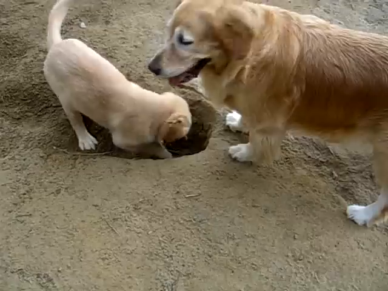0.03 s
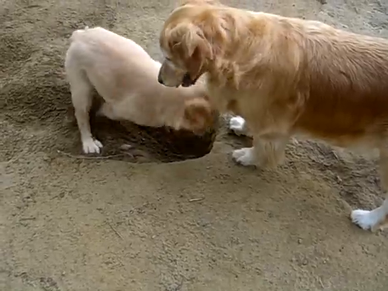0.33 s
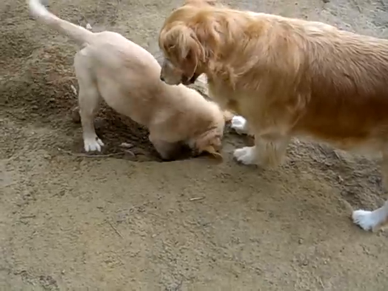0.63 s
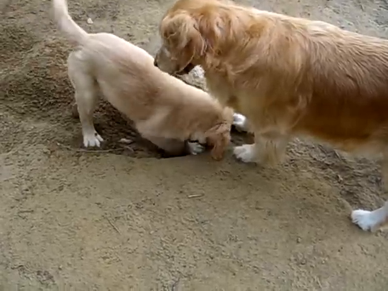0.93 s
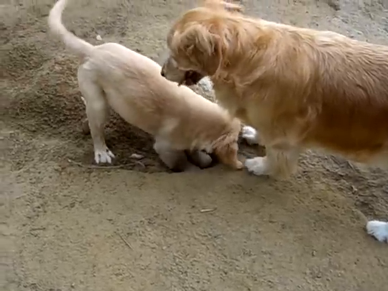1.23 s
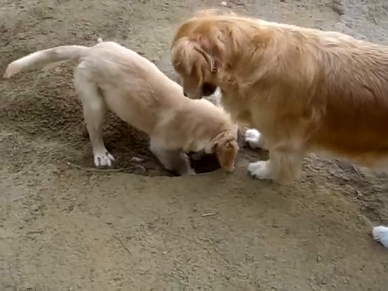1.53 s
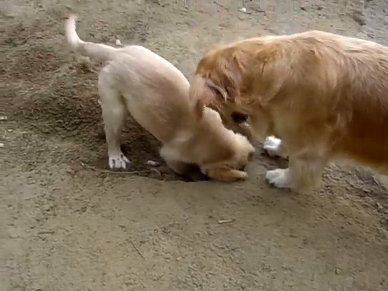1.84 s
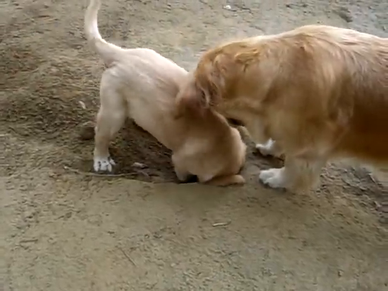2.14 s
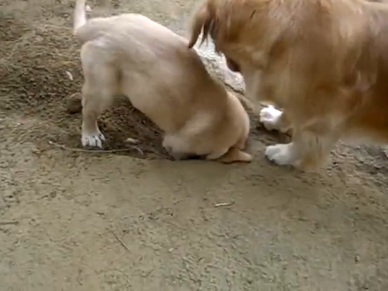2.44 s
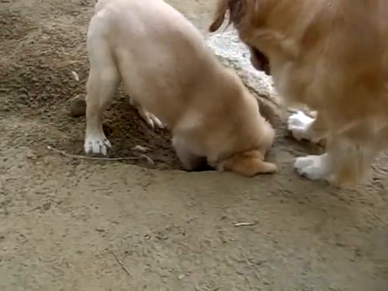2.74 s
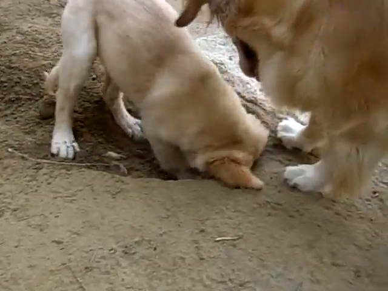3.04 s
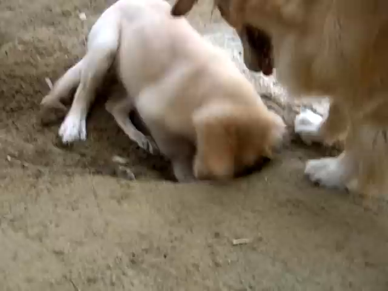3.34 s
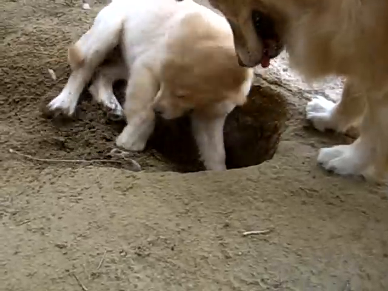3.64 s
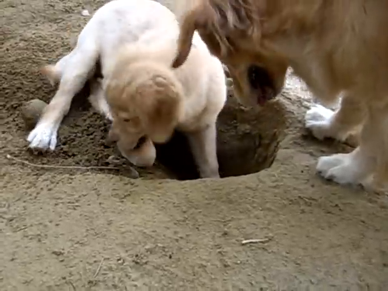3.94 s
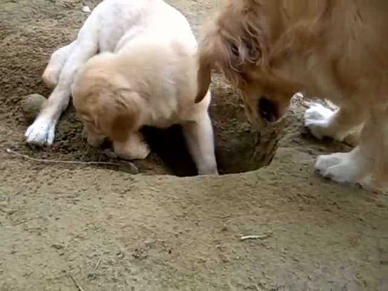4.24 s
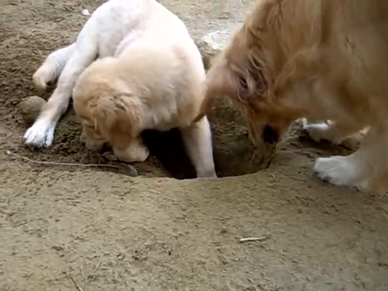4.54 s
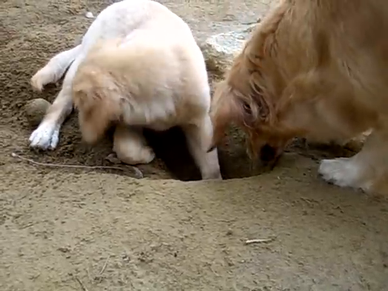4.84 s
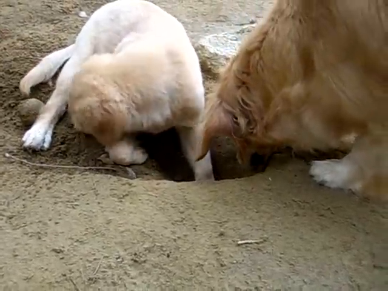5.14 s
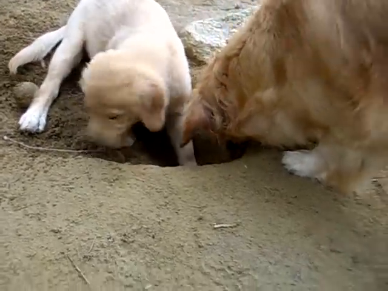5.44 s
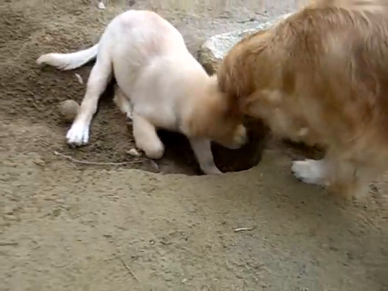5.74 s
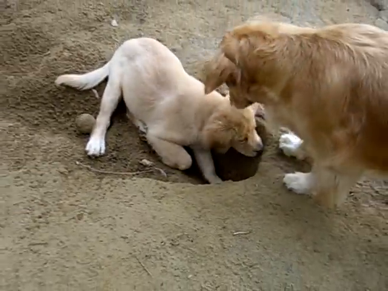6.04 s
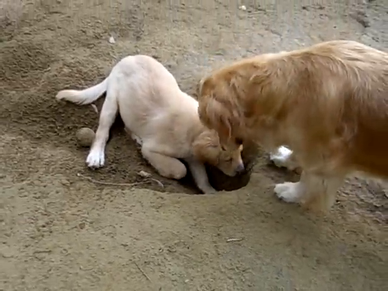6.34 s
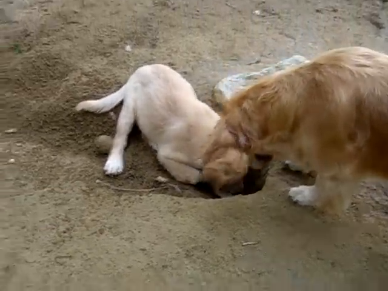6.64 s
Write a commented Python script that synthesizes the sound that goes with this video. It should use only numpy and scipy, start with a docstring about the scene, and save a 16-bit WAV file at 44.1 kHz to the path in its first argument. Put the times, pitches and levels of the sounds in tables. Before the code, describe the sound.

Quiet outdoor ambience of far traffic lies under steady microphone hiss and a thin, high whine. After an opening pop, dogs digging near the handheld camera make a short knock and a few soft, gritty scrapes. Midway the camera's case ticks sharply several times and a dog sniffs twice. The distant rumble rises a little, and brief sand scrapes, another sniff and some pebble-like clicks close the scene.

```python
"""A puppy and a grown dog root in a sandy hole, close to a small handheld camera.
First the microphone fades in on its own hiss and whine and far traffic; the camera pops and ticks.
At 1.5 s a paw knocks the wall of the hole and sand scrapes. Near 3 s the camera's case ticks
sharply, which briefly dips the gain; then a nose sniffs twice. A heavy vehicle rumbles by around
5 s. More scrapes, a last sniff and a few mouth clicks or pebbles end the scene."""
import sys
import numpy as np
from scipy import signal
from scipy.fft import rfft, irfft, next_fast_len
from scipy.io import wavfile
from scipy.ndimage import uniform_filter1d

SR = 44100
rng = np.random.default_rng(int(sys.argv[2]) if len(sys.argv) > 2 else 0)


def file_out(sig):
    """Save sig as 16-bit WAV at sys.argv[1]."""
    # one column per channel
    cols = np.atleast_2d(sig).T
    # limit, then scale
    lim = np.clip(cols, -1, 1)
    pcm = np.round(lim * 32767).astype(np.int16)
    wavfile.write(sys.argv[1], SR, pcm)


N = 299439
TIME = np.arange(N) / SR


def gain_of(db):
    """Turns decibels into a number to multiply a sound by."""
    return 10 ** (np.asarray(db) / 20)


def unit_level(x):
    """Scales a sound so that its average strength (rms) is one."""
    return x / np.sqrt(np.mean(x ** 2) + 1e-20)


def add(mix, start_s, sound):
    """Lays a sound into the mix at the given time."""
    part = mix[max(round(start_s * SR), 0):][:len(sound)]
    part += sound[:len(part)]


def coloured(x, colour):
    """Gives a sound a colour, a list of (frequency [Hz], level [dB]), and a strength of one."""
    hz = np.fft.rfftfreq(len(x), 1 / SR)
    points_hz, points_db = np.transpose(colour)
    curve_db = np.interp(np.log(hz + 1), np.log(points_hz + 1), points_db)
    return unit_level(irfft(rfft(x) * gain_of(curve_db), len(x)))


def noise(colour):
    """Steady noise of the given colour."""
    return coloured(rng.standard_normal(next_fast_len(N)), colour)[:N]


def wander(speed_hz):
    """A smooth random drift up and down, about one in size."""
    size = next_fast_len(N)
    keep_slow = np.exp(-(np.fft.rfftfreq(size, 1 / SR) / speed_hz) ** 2)
    return unit_level(irfft(rfft(rng.standard_normal(size)) * keep_slow, size)[:N])


def swell(middle_s, half_s):
    """A smooth rise to one and back, shaped like a bell."""
    return np.exp(-np.minimum(((TIME - middle_s) / half_s) ** 2, 100) / 2)


def settle(start_s, ease_s):
    """Stays at one until start_s, then dies away towards zero."""
    return np.exp(-np.maximum(TIME - start_s, 0) / ease_s)


def ring(tones, t):
    """Tones struck together; each fades by 60 dB over its ring time."""
    return sum(gain_of(db - 60 * t / ring_s) * np.sin(2 * np.pi * hz * t) for hz, db, ring_s in tones)


# colour of the microphone amplifier's hiss: (frequency [Hz], level [dB])
HISS_COLOUR = [(100, -7), (3000, -2), (4800, -1), (6200, 0.5), (7100, 2), (8200, 4), (9200, 0.5),
               (10000, -1.5), (11200, 2.5), (12300, 0), (13500, 0), (15700, -5), (15950, -42)]

def electronics(hiss_db=-48.5, whine_hz=15030, restarts_per_s=29.97, clock_hz=13184, clock_db=-66):
    """The camera's circuits hiss, hold a faint clock tone and whine anew with every picture."""
    whine_db = -55.5 - 13 * settle(0, ease_s=1.5)  # grows after switching on
    whine = gain_of(whine_db) * np.sin(2 * np.pi * whine_hz * (TIME % (1 / restarts_per_s)))
    clock = gain_of(clock_db) * np.sin(2 * np.pi * clock_hz * TIME)
    return gain_of(hiss_db) * noise(HISS_COLOUR) + np.sqrt(2) * (whine + clock)


# colour of the far traffic: (frequency [Hz], level [dB])
TRAFFIC_COLOUR = [(10, -11), (25, -5.5), (48, -3), (85, 0), (140, -3), (200, -2.5), (340, -7.5), (500, -9),
                  (800, -8.5), (1000, -10.5), (1350, -17), (2000, -21), (3200, -28.5), (6000, -48.5)]

def traffic(split_hz=300, rumble_db=-45.5, tyres_db=-43):
    """Engines rumble and tyres wash on far roads, each swelling on its own."""
    wash = noise(TRAFFIC_COLOUR)
    low = signal.sosfiltfilt(signal.butter(4, split_hz, fs=SR, output="sos"), wash)
    heavy_vehicle_db = 2.04 * swell(middle_s=5, half_s=1)
    lull_db = -2.35 * swell(middle_s=3.6, half_s=1.5)
    flutter_db = 0.67 * wander(16)
    rumble = unit_level(low) * gain_of(rumble_db + heavy_vehicle_db)
    tyres = unit_level(wash - low) * gain_of(tyres_db + lull_db + flutter_db)
    return rumble + tyres


# engines going by: (middle time [s], half length [s], pitch [Hz], level [dB])
PASSING_ENGINES = [(1.3, 0.76, 191.4, -53.5), (2.7, .85, 144.9, -50), (4.25, 0.26, 142.2, -46.5),
                   (4.4, 1, 113.4, -51), (5.254, 0.32, 265.4, -50.5), (6.6, 0.45, 95, -51)]

def engine_drones(waver_hz=1.583, throb=0.27):
    """Single engines stand out of the traffic as low, wavering tones."""
    out = np.zeros(N)
    for middle_s, half_s, hz, db in PASSING_ENGINES:
        cycles = np.cumsum(hz + waver_hz * wander(3.9)) / SR
        out += gain_of(db) * swell(middle_s, half_s) * np.sqrt(2) * np.sin(2 * np.pi * cycles)
    return out * (1 + throb * wander(6.1))


def hand_bump(start_s=3.008, hz=36, db=-35, ring_s=0.4):
    """The hand nudges the camera: a brief, deep wobble."""
    out = np.zeros(N)
    add(out, start_s, ring([(hz, db, ring_s)], np.arange(SR // 3) / SR))
    return out


# dull pops inside the camera: (time [s], level [dB], half length [s])
CAMERA_POPS = [(0.184, -13.2, 0.00026), (0.2914, -30, 0.00087)]
# tones of a small spring in the camera: (pitch [Hz], level [dB], ring time [s])
SPRING_TONES = [(2853, 0, 0.1), (8915, -5, 0.095), (11300, -2, 0.081), (12170, 2, 0.12)]

def camera_pops(spring_db=-46, rattle=0.49):
    """Each pop is a short push and a harder pull; the first sets a small spring rattling."""
    t, out = np.arange(SR // 6) / SR, np.zeros(N)
    pulse = lambda middle_s, half_s: np.exp(-np.minimum(((TIME - middle_s) / half_s) ** 2, 100))
    spring = gain_of(spring_db) * ring(SPRING_TONES, t) * (1 + rattle * wander(250)[:len(t)])
    add(out, CAMERA_POPS[0][0], spring)
    for time_s, db, half_s in CAMERA_POPS:
        push = 0.47 * pulse(time_s - 2.2 * half_s, 2 * half_s)
        pull = 1.07 * pulse(time_s, half_s)
        out += gain_of(db) * (push - pull)
    return out


# tones of a small metal part: (pitch [Hz], level [dB], ring time [s])
CLASP_TONES = [(4400, -8, 0.056), (5600, 3, 0.079), (7300, 0, .085), (11300, 7, 0.04), (13050, 2, .04)]

def metal_clasp(start_s=2.8611, db=-44):
    """A small metal part rings on faintly after one hard tick."""
    out = np.zeros(N)
    add(out, start_s, gain_of(db) * ring(CLASP_TONES, np.arange(SR // 6) / SR))
    return out


# tones that ring in a tick's knock: (pitch [Hz], level [dB], ring time [s])
KNOCK_TONES = [(760, 1, 0.013), (976, 1, 0.013), (1480, 0, 0.009), (1846, 3.5, 0.0073), (2310, -11, 0.01),
               (3100, -16, 0.0033), (3960, -8, 0.013)]
# colour of the dry snap that starts a tick: (frequency [Hz], level [dB])
SNAP_COLOUR = [(800, -36), (2500, -11), (3500, -5), (4300, -3.5), (6000, -3.5), (7400, 4), (8300, 5.5),
               (10000, -6.5), (13000, 4.5), (16000, -10.5)]
# small hard ticks close to the microphone: the camera's case, and near the end mouth clicks or pebbles
# (time [s], knock level [dB], knock pitch [Hz], snap level [dB], ping level [dB])
CLOSE_TICKS = [(0.291, -24.5, 2040, -32, -41), (0.2917, -30, 1160, -47, -50),
               (0.8413, -38.5, 1630, -39, -27.5), (1.4526, -41.5, 1770, -36.5, -49),
               (1.538, -31, 2100, -35, -49), (1.729, -45, 1970, -50, -40), (1.7406, -33, 2400, -35.5, -32),
               (2.8314, -42.5, 2630, -32.5, -23.5), (2.8611, -34.5, 1925, -28.5, -20.5),
               (2.9829, -35.5, 1230, -33, -15.5), (3.1351, -35, 2200, -28.5, -32),
               (6.5922, -50, 1500, -43.5, -47), (6.6337, -25.5, 2080, -43, -60),
               (6.67, -44, 1700, -47, -60), (6.699, -35.5, 1020, -60, -60)]

def close_ticks(knock_ring_s=0.013, snap_ring_s=0.01, ping_ring_s=0.0033,
                snap_trim_db=1, ping_trim_db=-2.5):
    """Each small, hard contact makes a dry snap, a short knock and a high ping."""
    t, out = np.arange(1024) / SR, np.zeros(N)
    onset = 1 - np.exp(-t / 0.000078)  # the contact takes a moment to let go
    # sets a level as if the sound were spread over 5 ms
    at_level = lambda x, db: gain_of(db) * x * np.sqrt(0.005 * SR / np.sum(x ** 2))
    for time_s, knock_db, knock_hz, snap_db, ping_db in CLOSE_TICKS:
        stiffness = knock_hz / 1900  # a stiffer spot knocks higher, pings higher and dies sooner
        ping_hz = 11770 * stiffness ** 0.12
        ring_scale = stiffness ** -0.69
        # the tones nearest the knock's pitch ring most
        tones = [(hz, db - 6 * np.log2(hz / knock_hz) ** 2, ring_s * ring_scale)
                 for hz, db, ring_s in KNOCK_TONES]
        knock = ring([(knock_hz, 0, knock_ring_s * ring_scale)] + tones, t) * onset
        bass_cut = signal.butter(2, knock_hz / 2, "high", fs=SR, output="sos")  # small things lack bass
        knock = at_level(signal.sosfilt(bass_cut, knock), knock_db)
        snap_fade = gain_of(-60 * t / (snap_ring_s * ring_scale))
        snap = coloured(rng.standard_normal(len(t)), SNAP_COLOUR) * snap_fade * onset
        snap = at_level(snap, snap_db + snap_trim_db)
        ping = ring([(ping_hz, 0, ping_ring_s * ring_scale)], t) * onset
        ping = at_level(ping, ping_db + ping_trim_db)
        add(out, time_s, knock + snap + ping)
    return out


# colour of rubbing sand: (frequency [Hz], level [dB])
SAND_COLOUR = [(300, -27), (800, -4), (1300, -3.5), (1900, 6.5), (3100, -5.5), (3900, 1.5), (4800, -5.5),
               (7000, 1.5), (9000, -1.5), (10000, -1.5), (11800, 2), (14000, -7), (16000, -45)]
# strokes through the sand: (middle time [s], half length [s], level [dB])
SAND_STROKES = [(1.538, 0.044, -42), (1.667, .055, -51), (2.169, 0.014, -49.5), (2.393, .012, -49.5),
                (2.804, 0.045, -54), (5.556, 0.054, -52), (6.337, .045, -52), (6.577, 0.024, -42.5)]

def sand_scrapes(grains_per_s=10000, spread_db=0.3, clump_db=1.4, stir_db=-63):
    """Each stroke rubs a crowd of sand grains; a few keep shifting between strokes."""
    size = next_fast_len(N)
    strengths = gain_of(spread_db * np.minimum(rng.exponential(1, size), 4)) * rng.standard_normal(size)
    hits = rng.random(size) < grains_per_s / SR
    grains = coloured(strengths * hits, SAND_COLOUR)[:N]
    strokes = sum(gain_of(db) * swell(middle_s, half_s) for middle_s, half_s, db in SAND_STROKES)
    return grains * (strokes + gain_of(stir_db)) * gain_of(clump_db * wander(48))


def grit_clicks(per_stroke=2, pitch_hz=1900, ring_s=0.008, boost_db=11):
    """Each stroke knocks bits of grit together, and a few more click under the shuffling paws."""
    t, out = np.arange(SR // 40) / SR, np.zeros(N)
    halfway_s = TIME[-1] / 2
    strays = [(halfway_s, halfway_s, -52)] * 2  # these clicks can land anywhere in the scene
    for middle_s, half_s, db in SAND_STROKES + strays:
        for when, size, pitch in rng.uniform(-1, 1, (per_stroke, 3)):
            tone = (pitch_hz * 2 ** (pitch / 4), db + boost_db + 2 * size, ring_s)
            add(out, middle_s + half_s * when, ring([tone], t))
    return out


# tones of the hole's packed wall: (pitch [Hz], level [dB], ring time [s])
WALL_TONES = [(650, -1, 0.039), (810, -2, .033)]

def paw_knock(start_s=1.5385, db=-26):
    """A paw strikes the wall of the hole: a short, hollow knock."""
    out = np.zeros(N)
    add(out, start_s, gain_of(db) * ring(WALL_TONES, np.arange(SR // 10) / SR))
    return out


# colour of air rushing through a nose: (frequency [Hz], level [dB])
NOSE_COLOUR = [(400, -18), (1200, 4.5), (2500, -3), (4400, -0.5), (5500, -3), (6100, 4), (8000, -6),
               (10300, -6), (12200, 1.5), (14000, -24)]
# a dog's sniffs: (middle time [s], half length [s], level [dB], nostril pitch [Hz])
DOG_SNIFFS = [(3.469, 0.024, -42.5, 3840), (3.735, .015, -53.5, 3600), (6.39, 0.021, -43.5, 2220)]

def dog_sniffs(whistle_width_hz=300, whistle_share=0.42):
    """Air drawn through a dog's nose hisses, and the nostril rings with a soft whistle."""
    air, out = noise(NOSE_COLOUR), np.zeros(N)
    for middle_s, half_s, db, hz in DOG_SNIFFS:
        nostril = signal.iirpeak(hz, hz / whistle_width_hz, SR)
        whistle = unit_level(signal.lfilter(*nostril, air))
        out += gain_of(db) * swell(middle_s, half_s) * (air + whistle_share * whistle)
    return out


def scene():
    """One microphone hears it all; the outdoor sounds and the electronics fade in."""
    gain_db = -1.5 - 15.5 * settle(start_s=0.099, ease_s=0.17)  # starts low, then eases up
    fade_in = gain_of(gain_db) * (TIME > 0.041)  # silent until the microphone opens
    outdoors = traffic() + engine_drones() + sand_scrapes() + dog_sniffs() + grit_clicks() + paw_knock()
    close_sounds = close_ticks() + metal_clasp() + camera_pops() + hand_bump()
    mono = fade_in * (outdoors + electronics()) + close_sounds
    return np.array([mono, mono])


# narrow bands the camera cuts out against motor noise: (frequency [Hz], width [Hz])
MOTOR_NOTCHES = [(6550, 260), (7520, 260)]

def record(dry, threshold_db=-19, dip_share=0.23, recover_db_per_s=45, top_hz=16400):
    """The camera cuts two narrow bands, dips its gain after sharp peaks and drops the highest treble."""
    for hz, width_hz in MOTOR_NOTCHES:
        dry = signal.lfilter(*signal.iirnotch(hz, hz / width_hz, SR), dry)
    level_db = 10 * np.log10(abs(uniform_filter1d(dry[0] ** 2, size=44)) + 1e-12)  # over 1 ms
    fall_db = TIME * recover_db_per_s
    peak_db = np.maximum.accumulate(level_db + fall_db) - fall_db  # jumps up, then sinks slowly
    excess_db = np.maximum(peak_db - threshold_db, 0)
    lag = np.exp(-1 / (0.005 * SR))  # the gain takes about 5 ms to react
    dip_db = dip_share * signal.lfilter([1 - lag], [1, -lag], excess_db)
    treble_cut = signal.firwin(511, top_hz, window=("kaiser", 9), fs=SR)
    return signal.oaconvolve(dry / gain_of(dip_db), treble_cut[None], "same")


dry = scene()
out = record(dry)
file_out(out)
```